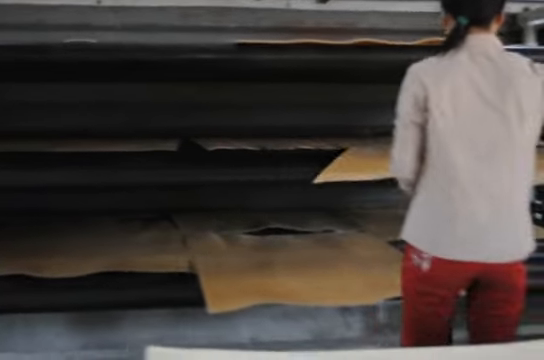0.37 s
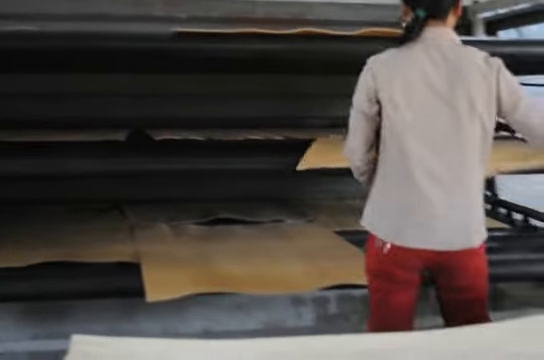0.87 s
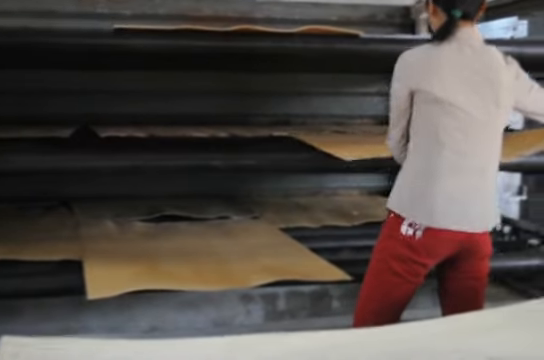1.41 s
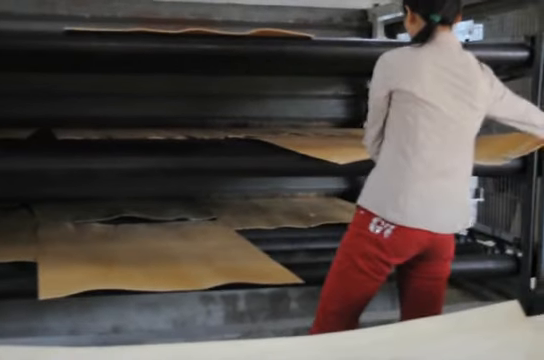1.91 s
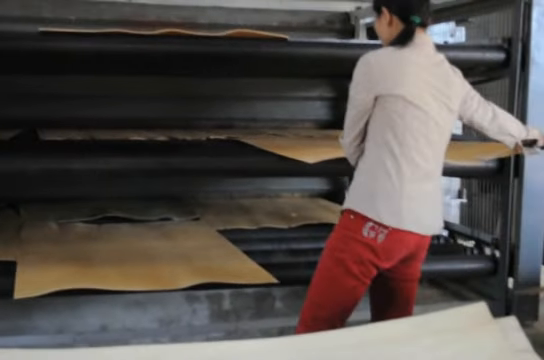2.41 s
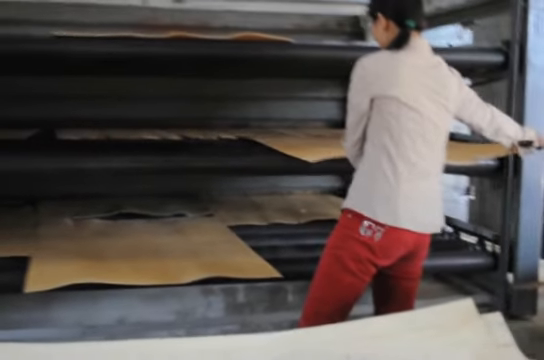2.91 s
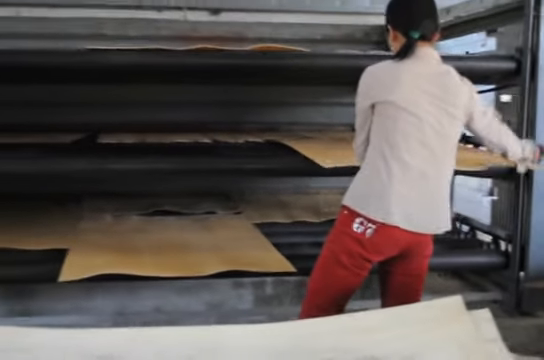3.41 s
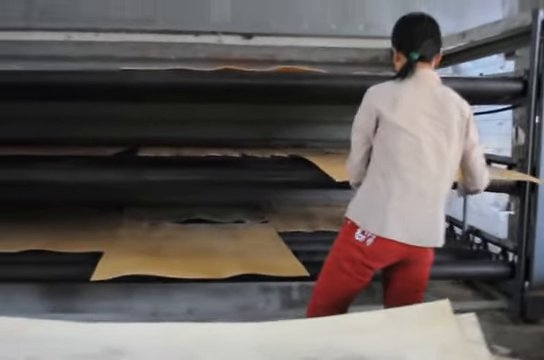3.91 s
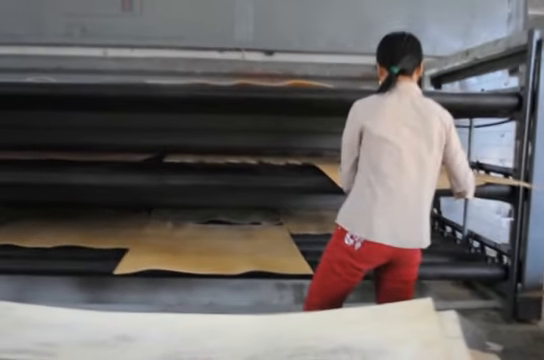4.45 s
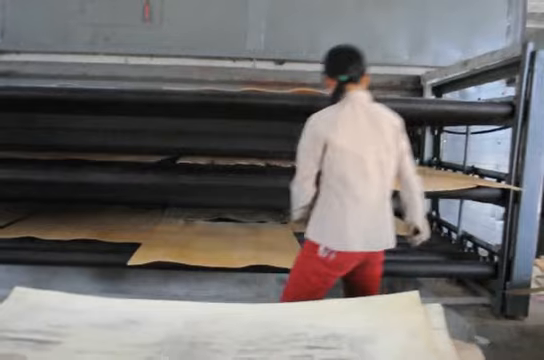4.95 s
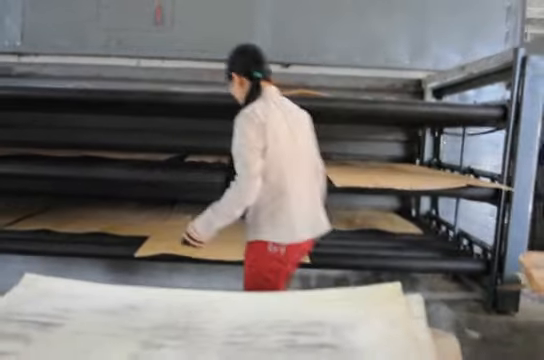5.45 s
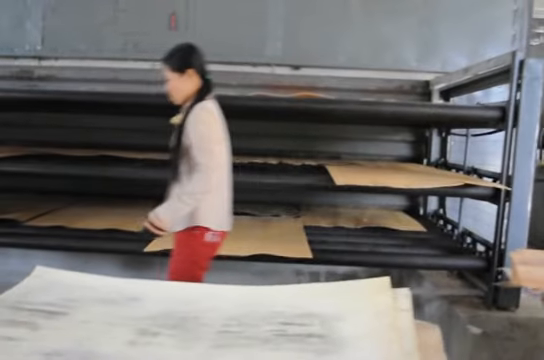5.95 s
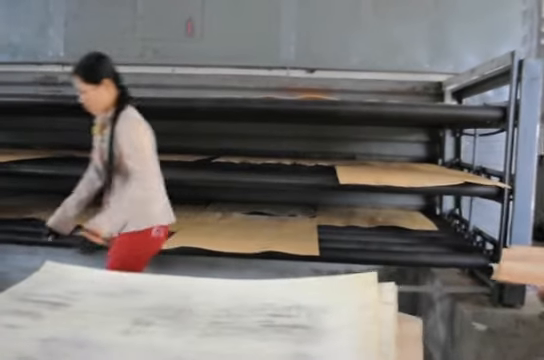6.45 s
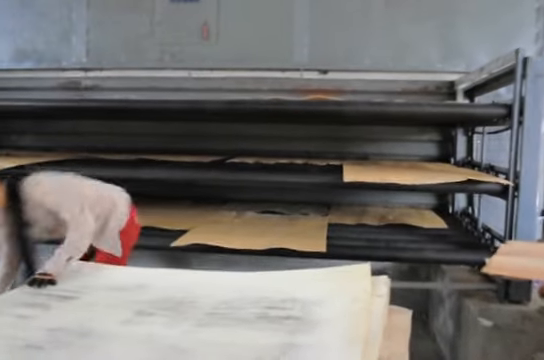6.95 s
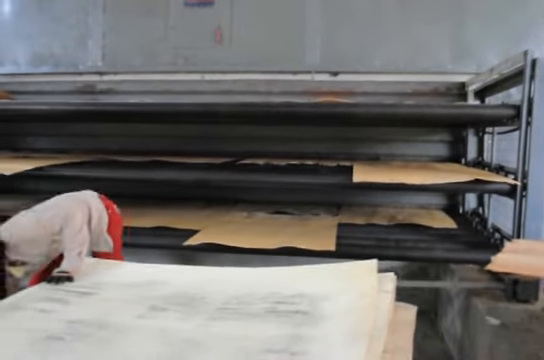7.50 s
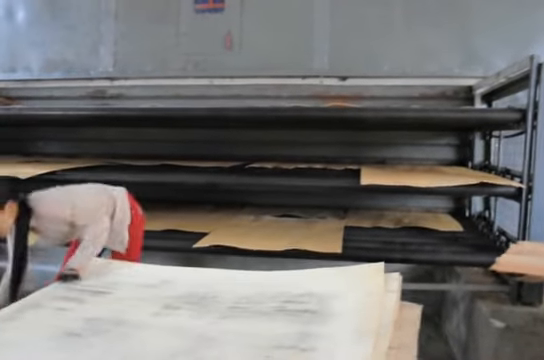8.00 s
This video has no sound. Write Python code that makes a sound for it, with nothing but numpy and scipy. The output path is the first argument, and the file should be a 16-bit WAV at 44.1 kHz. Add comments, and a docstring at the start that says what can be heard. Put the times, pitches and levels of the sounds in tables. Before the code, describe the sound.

Loud hot-air machine noise fills a factory hall, droning and faintly whistling, with brittle sheet crackles at the start and one cluster midway.

```python
"""In a factory hall, beside a long roller dryer for wood veneer, heard by a small camera microphone.
Hot-air fans roar as coloured noise and hum in sines at multiples of their blade rate; a gear tone and
a bearing whine drift over them, and faint whistles swell and fade. Now and then a dry sheet snaps,
a short ring with crackle and an answer from the hall. Roar and tones sag briefly again and again;
the microphone clips softly, and its low sampling rate mirrors some treble upwards."""
import sys
import numpy as np
from scipy import signal
from scipy.fft import rfft, irfft, next_fast_len
from scipy.io import wavfile
from scipy.ndimage import uniform_filter1d, map_coordinates

SR = 44100
rng = np.random.default_rng(int(sys.argv[2]) if len(sys.argv) > 2 else 0)


def field_ratio(decibels):
    """Amplitude ratio for a level in dB (20 dB per decade); scalars and array-likes work."""
    return 10 ** (np.asarray(decibels, dtype=float) / 20)


def generate_wav(sig):
    """Save sig (samples, or channels by samples) to the path in sys.argv[1] as 16-bit PCM at SR."""
    pcm = np.round(np.clip(np.atleast_2d(sig).T, -1, 1) * 32767).astype(np.int16)
    wavfile.write(sys.argv[1], SR, pcm)


N = 357728


def unit(x):
    """Scales to rms 1."""
    return x / np.sqrt(np.mean(x ** 2) + 1e-20)


def along(points, hz):
    """Joins (Hz, value) points on a log frequency axis."""
    f, v = np.transpose(points)
    return np.interp(np.log(hz + 1), np.log(f + 1), v)


def curves(rows):
    """Gives one value per sample for each column after the time."""
    s, *cols = np.transpose(rows)
    return [np.interp(np.arange(N) / SR, s, c) for c in cols]


def wobble(rate):
    """A smooth random curve with rate knots a second."""
    return map_coordinates(rng.standard_normal(N // 100), [np.arange(N) * rate / SR])


def filtered(x, response):
    """Shapes the spectrum of x by a response of frequency."""
    m = next_fast_len(N + 8192)
    return irfft(rfft(x, m) * response(np.fft.rfftfreq(m, 1 / SR)), m)[:N]


def tone(hz, db, waver_db, slip):
    """A sine about the given rms level whose strength (dB) and phase (slip, radians) waver at random."""
    cycles = np.cumsum(np.broadcast_to(hz, N)) / SR + rng.random()
    phase = 2 * np.pi * cycles + slip * wobble(rate=4)
    return np.sqrt(2) * field_ratio(db + waver_db * wobble(rate=7)) * np.sin(phase)


def swell(start, end):
    """Rises and falls once, 0 to 1 and back."""
    progress = np.clip((np.arange(N) / SR - start) / (end - start), 0, 1)
    return np.sqrt(np.sin(np.pi * progress).clip(0))


def swells_db(rows):
    """Level in dB of a tone whose swells add in power to a faint steady level."""
    steady_db = -42
    swelling = sum((field_ratio(db) * swell(start, end)) ** 2 for start, end, db in rows)
    return 10 * np.log10(field_ratio(steady_db) ** 2 + swelling)


def turbulence(patchy_db):
    """White noise whose strength varies in small patches of time and pitch."""
    z = signal.stft(rng.standard_normal(N + 512), nperseg=512)[2]
    field = uniform_filter1d(rng.standard_normal(z.shape), size=8, axis=0)
    field = uniform_filter1d(field, size=12, axis=1)
    return signal.istft(z * field_ratio(patchy_db * unit(field)), nperseg=512)[1][:N]


def bumps(modes, hz):
    """Summed power of the resonances at each frequency."""
    return sum(field_ratio(db) ** 2 / (1 + (2 * (hz - c) / w) ** 2) ** 2 for c, w, db in modes)


# Air moving in ducts and casing. Each row: frequency in Hz, relative density in dB per Hz.
AIR_COLOUR = [(20, -41), (36, -34), (52, -15.5), (72, -15.5), (110, -11), (140, -6.5), (200, -8.5),
              (270, -6), (295, -6.5), (308, -8), (330, -6.5), (510, -9), (700, -8), (1360, -12),
              (1650, -13), (2200, -17), (3500, -20.5), (5000, -22), (5500, -26.5)]
# Broad resonances of the casing panels. Each row: centre in Hz, width in Hz, power in dB against the air.
PANEL_MODES = [(85.3, 9.5, 9), (95, 7.3, 5.5), (169.8, 10, 5.5), (241.4, 17, 0), (347.6, 10, 1),
               (978, 36, -1), (1300, 200, -4), (2540, 930, -2.5)]
# Rumble, dropping early, then returning and swelling unevenly. Each row: time in seconds, gain in dB.
RUMBLE_GAIN = [(0, 0.5), (1.5, -5), (2.2, -0.5), (3.6, -0.5), (4.4, 0), (5.3, 2.5), (5.9, -2), (6.5, 3),
               (8.11, 0)]
# Upper roar, nearly steady, dipping slightly late on. Each row: time in seconds, gain in dB.
UPPER_GAIN = [(0, .5), (1.2, 0.5), (1.8, 0.5), (2.9, 0.5), (3.6, 0.5), (4.4, 0.5), (5.5, -.5), (6.5, 0),
              (8.11, 0.5)]


def air():
    """Duct noise roars through ringing panels; its bass and upper part reach the listener by their own paths."""
    (rumble_db,), (upper_db,) = curves(RUMBLE_GAIN), curves(UPPER_GAIN)

    def colour(hz):
        return field_ratio(along(AIR_COLOUR, hz)) * np.sqrt(1 + bumps(PANEL_MODES, hz))

    roar = unit(filtered(turbulence(patchy_db=0.46), colour))
    rumble = filtered(roar, lambda hz: 1 / (1 + (hz / 125) ** 6))
    # centred on 1900 Hz, on a log axis
    upper = filtered(roar, lambda hz: 1 / (1 + (np.log((hz + 1) / 1900) / 0.8) ** 4))
    return roar + (field_ratio(rumble_db) - 1) * rumble + (field_ratio(upper_db) - 1) * upper


BLADE_HZ = 140.8
# The multiples of the blade rate that stand out.
BLADE_MULTIPLES = (1, 2, 3, 5)
# Blade hum, varying as the listener shifts in the hall. Each row: time in seconds, level in dB before the mix.
HUM_LEVEL = [(0, -23.5), (.4, -24.5), (.8, -26), (1.2, -23.5), (2.8, -24), (3.15, -22.5), (3.9, -26),
             (4.4, -24), (5.2, -26.5), (5.7, -20.5), (6.3, -23.5), (7.3, -18), (7.65, -20.5), (8.11, -19.5)]
# Swells of the second, third and fifth blade multiples.
# Each row: start in seconds, end in seconds, level in dB before the mix.
SECOND_MULTIPLE = [(.1, .7, -26), (.85, 2.2, -29.5), (2.3, 3.4, -30.5), (3.8, 4.2, -28.5),
                   (4.6, 5.15, -28.5), (5.4, 6.5, -31.5), (7.3, 8.3, -29.5)]
THIRD_MULTIPLE = [(2.6, 5.8, -30.5), (6.9, 7.5, -30)]
FIFTH_MULTIPLE = [(3.0, 4.6, -35), (3.9, 5.5, -33)]
# Shaft tones of a three-bladed wheel. Each row: multiple of the shaft rate, level in dB before the mix.
SHAFT_TONES = [(1, -47), (2, -38), (4, -41)]


def fans():
    """Blades pass at a steady rate, higher multiples more smeared; the shaft turns at a third of it."""
    hum_db, = curves(HUM_LEVEL)
    levels_db = [hum_db, swells_db(SECOND_MULTIPLE), swells_db(THIRD_MULTIPLE), swells_db(FIFTH_MULTIPLE)]
    blades = sum(tone(k * BLADE_HZ, db, waver_db=0.4, slip=0.054 * k ** 2)
                 for k, db in zip(BLADE_MULTIPLES, levels_db))
    shaft_hz = BLADE_HZ / 3
    shaft = sum(tone(k * shaft_hz, db, waver_db=3.0, slip=0.26) for k, db in SHAFT_TONES)
    return blades + shaft


# Gear tone, standing out in the middle. Each row: time in seconds, level in dB before the mix.
GEAR_LEVEL = [(0, -35), (.45, -30), (1.1, -31.5), (1.8, -39.5), (2.5, -46), (3.0, -35), (3.3, -22.5),
              (3.7, -29), (4.0, -25), (4.55, -23.5), (4.8, -27.5), (5.0, -25.5), (5.3, -26), (5.5, -27.5),
              (5.8, -29), (6.15, -24.5), (6.4, -33), (6.7, -38.5), (7.6, -29.5), (8.11, -35)]


def gear():
    """Meshing teeth give one clean tone."""
    gear_db, = curves(GEAR_LEVEL)
    return tone(576.2, gear_db, waver_db=0.5, slip=0.25)


# Drift of the bearing whine. Each row: time in seconds, pitch in Hz.
WHINE_PITCH = [(0, 2319), (.7, 2320), (1.15, 2322), (2, 2324), (3, 2321), (4, 2318.5), (4.45, 2317.5),
               (5.15, 2319), (6.1, 2318), (7, 2319.5), (8.11, 2319)]
# The whine and its side lines take turns.
# Each row: time in seconds, then levels of whine, first and second side line in dB before the mix.
WHINE_LEVELS = [(0, -38, -41, -41), (.3, -31.5, -41, -38.5), (.5, -42, -44.5, -43.5),
                (.8, -34, -39.5, -44.5), (1.15, -35, -35, -36), (1.45, -34, -40.5, -42),
                (1.65, -47.5, -45.5, -35.5), (2, -32.5, -39, -44.5), (2.5, -38, -35, -35),
                (3, -33, -43.5, -35.5), (3.3, -43, -37, -42), (3.5, -44.5, -35.5, -50),
                (4, -49, -41, -44.5), (4.35, -30, -52.5, -43.5), (4.75, -40.5, -51, -52),
                (5.15, -29.5, -46, -48), (5.45, -46, -45, -46.5), (5.75, -42, -32.5, -46),
                (6.15, -38, -42, -44), (6.4, -40.5, -47.5, -42), (6.7, -35.5, -41, -40),
                (6.9, -34.5, -30, -38), (7.2, -34, -35, -41), (7.55, -34.5, -45, -48.5),
                (7.85, -34, -38.5, -34), (8.11, -40.5, -44.5, -42)]


def bearing():
    """A whine with side lines one and two shaft turns above it, beating into a throb once a turn."""
    turn_hz, in_step_s = 9.6, 6.955  # all three lines are in phase at in_step_s
    low_hz, = curves(WHINE_PITCH)
    cycles = np.cumsum(low_hz) / SR + rng.random()
    turns = turn_hz * (np.arange(N) / SR - in_step_s)
    whine = 0
    for k, db in enumerate(curves(WHINE_LEVELS)):
        strength = np.sqrt(2) * field_ratio(db + 0.71 * wobble(rate=5.9))
        whine = whine + strength * np.sin(2 * np.pi * (cycles + k * turns))
    return whine


# Snaps of dry sheets. Each row: start in seconds, ring level in dB before its attack,
# centre in Hz, ring's 60 dB decay in seconds.
SHEET_SNAPS = [(0.0265, -9, 4700, .007), (0.029, -11, 2300, .04), (0.032, -13, 3300, .025),
               (0.053, -12, 5210, .015), (0.0572, -10, 5250, .012), (0.0582, -8, 3620, .018),
               (0.061, -14, 4800, .025), (0.065, -11.5, 5200, .015), (0.0715, -15, 5200, .02),
               (0.078, -18, 5200, .03), (0.180, -16, 5040, .015), (0.669, -11, 5350, .014),
               (0.670, -16, 4200, .02), (0.6715, -13, 2600, .03), (0.6742, -11, 5200, .012),
               (0.6775, -10.5, 5000, .013), (0.683, -17, 5300, .02), (0.692, -18, 5100, .02),
               (0.700, -18, 5000, .04), (0.717, -16, 3300, .015), (0.722, -13, 5150, .012),
               (0.936, -15, 4840, .03), (1.2315, -14, 5290, .02), (1.2325, -16, 4400, .015),
               (1.2368, -10, 4100, .008), (1.2438, -11, 2400, .012), (1.2442, -10, 4200, .005),
               (1.2452, -14, 4900, .015), (1.247, -14, 3200, .012), (1.249, -18, 5300, .015),
               (3.5566, -5.5, 4290, .016), (3.5574, -10.5, 5400, .012), (3.561, -9, 4950, .025),
               (3.5635, -10, 5300, .013), (3.566, -15, 3000, .02), (3.569, -15, 4600, .03),
               (3.574, -16, 4900, .02), (3.578, -14, 4800, .02), (3.581, -15, 5050, .012),
               (3.588, -18, 4800, .03), (3.603, -13, 3090, .015), (3.6045, -15, 4300, .007),
               (3.612, -18, 4900, .015)]


def snaps():
    """Each snap is a short ring and a burst of crackle round its pitch, with a longer answer from the hall."""
    crackle_db, crackle_lasts = -8, 1.4  # under the ring; times the ring's decay
    hall_db, hall_t60_s = -8.5, .45  # under the crackle
    out, t = np.zeros(N + SR), np.arange(SR // 2) / SR
    f = np.fft.rfftfreq(len(t), 1 / SR)
    attack = 1 - np.exp(-t / .0004)
    hall = field_ratio(hall_db - 60 * t / hall_t60_s) * (1 - np.exp(-t / 0.016))
    for s, db, hz, t60 in SHEET_SNAPS:
        body = field_ratio(-11.5) / (1 + ((f - 3000) / 900) ** 4)  # the sheet's body
        colour = 1 / (1 + ((f - hz) / 1200) ** 2) + body
        crackle = unit(irfft(rfft(rng.standard_normal(len(t))) * colour, len(t)))
        ring = field_ratio(-60 * t / t60) * np.sin(2 * np.pi * hz * t)
        fade = field_ratio(-60 * t / (crackle_lasts * t60)) + hall
        snap = field_ratio(db) * attack * (ring + field_ratio(crackle_db) * fade * crackle)
        out[round(s * SR):][:len(t)] += snap
    return out[:N]


# Brief sags of level. Each row: start in seconds, nominal depth in dB, of which a lone sag reaches about 0.64.
LEVEL_SAGS = [(0.07, 5), (0.451, 2), (0.726, 4), (1.051, 2.5), (1.26, 2.3), (1.539, 2.5), (1.791, 2),
              (1.941, 3), (2.082, 3), (2.24, 3), (2.441, 1.5), (3.232, 4.5), (3.512, 4), (3.755, 2.5),
              (3.888, 2.7), (4.227, 2.5), (4.644, 3.5), (4.861, 2.5), (5.16, 2), (5.248, 4.5), (5.667, 3.5),
              (5.835, 4.5), (5.955, 1.5), (6.221, 2), (6.384, 3.5), (6.613, 4), (6.856, 2.5), (7.077, 2),
              (7.306, 3.5), (7.379, 4.5), (7.656, 4), (7.891, 3.5), (8.06, 1)]


def sags():
    """Gain that drops quickly and creeps back; sags pile up when they follow closely."""
    fall_s, return_s = .014, 0.091  # time constants
    s, db = np.transpose(LEVEL_SAGS)
    t = np.arange(SR) / SR
    shape = (1 - np.exp(-t / fall_s)) * np.exp(-t / return_s)
    starts = np.bincount((s * SR).astype(int), db, N)
    return field_ratio(-signal.fftconvolve(starts, shape)[:N])


# Fainter tones. Each row: start in seconds, end in seconds, pitch in Hz, level in dB before the mix.
FAINT_TONES = [(.6, 2.2, 295, -30), (3.6, 4.6, 295, -34), (5.5, 7.5, 295, -29), (2.8, 4.1, 322, -34),
               (.5, 1.4, 2475, -34), (5.4, 7.4, 2475, -41), (1.8, 2.4, 2732, -39), (1.9, 3.3, 2711, -41),
               (3.4, 5.3, 2707, -38), (3.8, 4.5, 2417, -39), (5.3, 6.0, 2417, -37), (5.8, 6.6, 2610, -38),
               (6.0, 7.3, 2707, -40), (7.7, 8.3, 2417, -36)]


def whistles():
    """Each faint tone is a wavering sine that rises and falls once."""
    return sum(swell(start, end) * tone(hz, db, waver_db=2, slip=.8) for start, end, hz, db in FAINT_TONES)


def scene():
    """Roar and tones sag together; the snaps lie on top, untouched by the sags."""
    tones = fans() + gear() + bearing() + whistles()
    machine = field_ratio(-13.5) * air() + field_ratio(0.67) * tones
    return (sags() * machine + snaps())[None]


def top_cut(x):
    """Nothing passes above the cut-off."""
    return signal.sosfilt(signal.butter(12, 7020, fs=SR, output="sos"), x)


# Smoothing that lets a mirror image of the treble through. Each row: frequency in Hz, gain in dB.
SMOOTHING_GAIN = [(4500, 0.5), (5500, 1.5), (6000, -9), (6500, -23), (7000, -40), (7200, -79)]


def record(dry):
    """The microphone clips softly and keeps every fourth sample, which mirrors the treble, then smooths."""
    step = 4
    x = dry[0] / (1 + np.abs(dry[0] / .86) ** 8) ** (1 / 8)
    x = filtered(x, lambda hz: hz < SR / step / 2)
    kept = step * x * (np.arange(N) % step == 0)
    mix = filtered(kept, lambda hz: field_ratio(along(SMOOTHING_GAIN, hz)) * (hz < SMOOTHING_GAIN[-1][0]))
    return top_cut(mix[None])


dry = scene()
out = record(dry)
generate_wav(out)
```